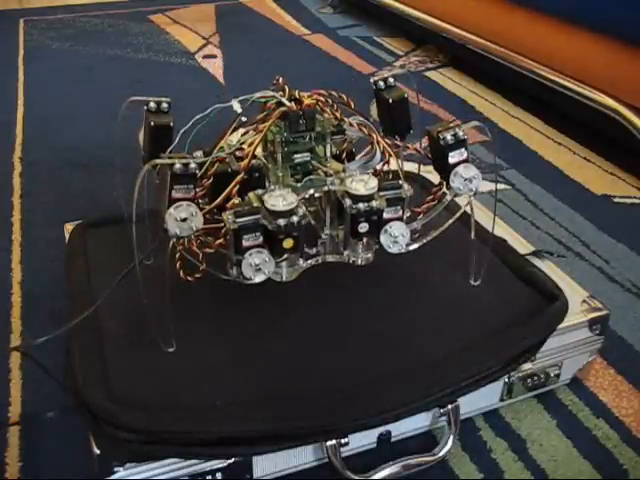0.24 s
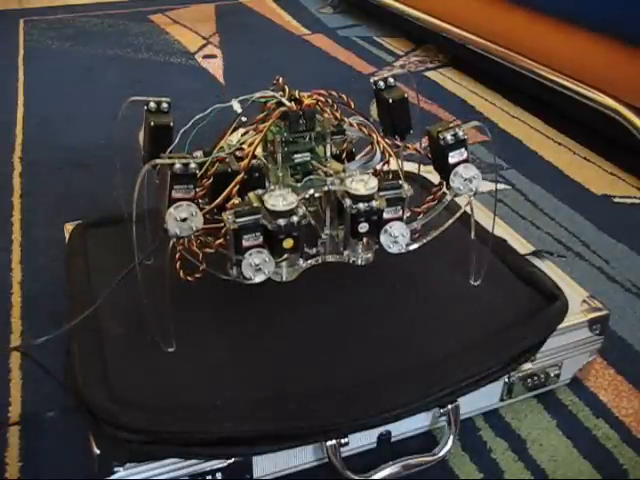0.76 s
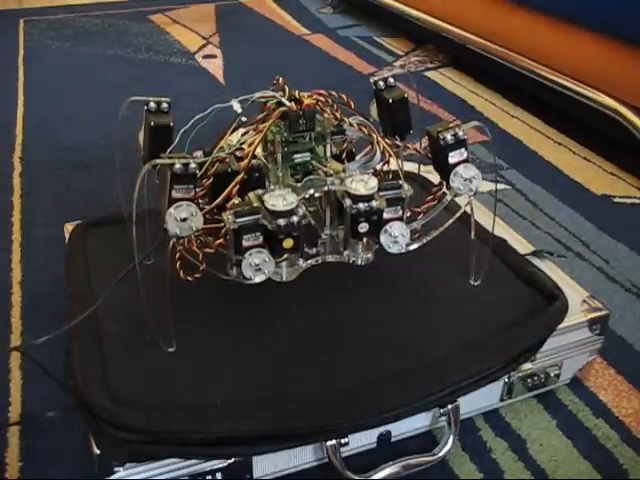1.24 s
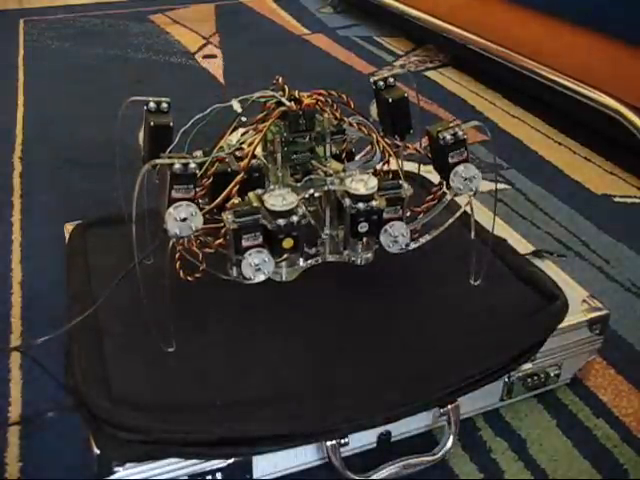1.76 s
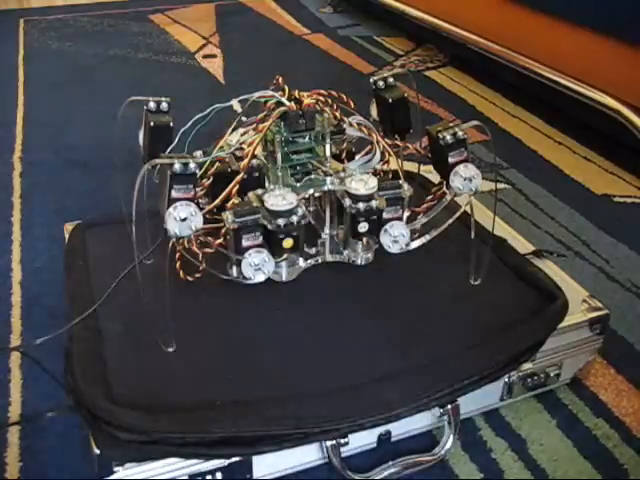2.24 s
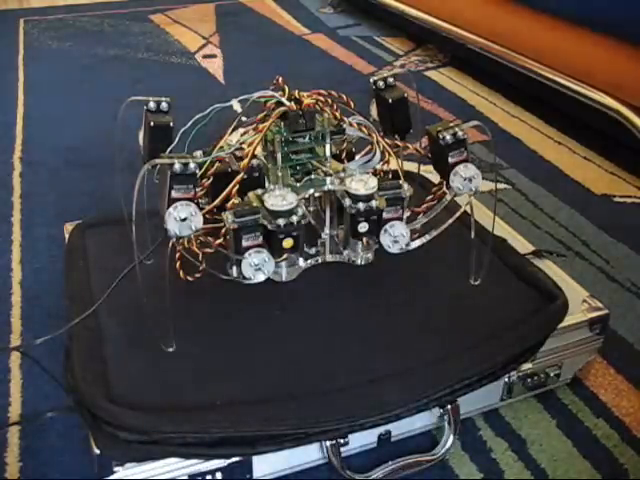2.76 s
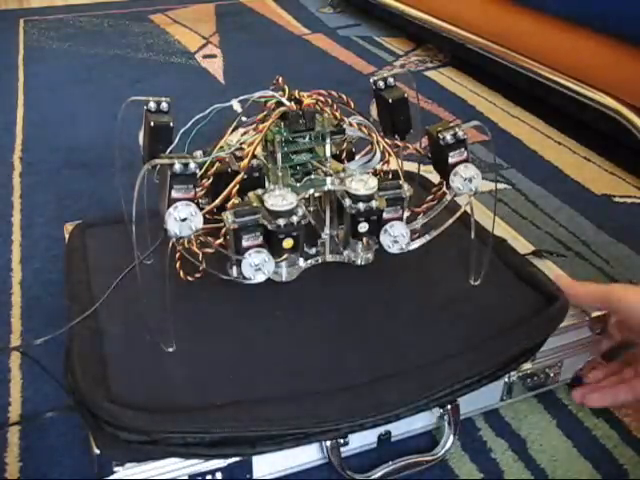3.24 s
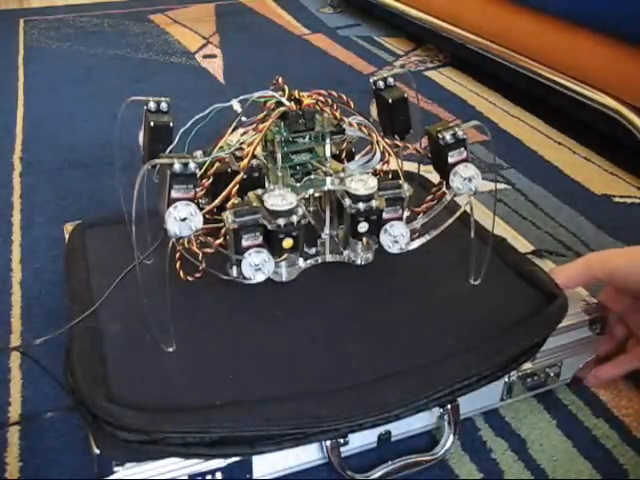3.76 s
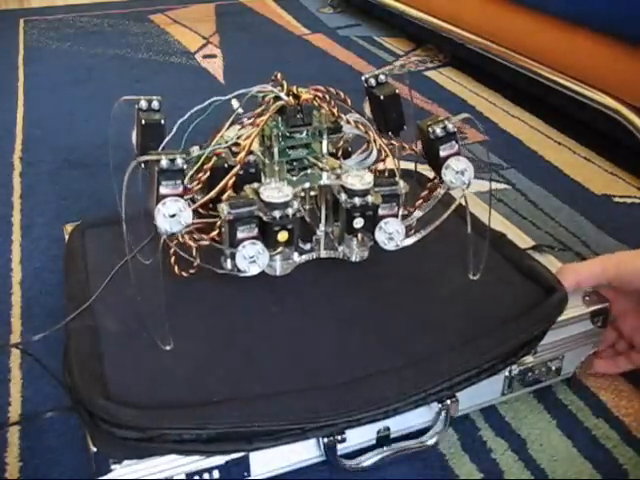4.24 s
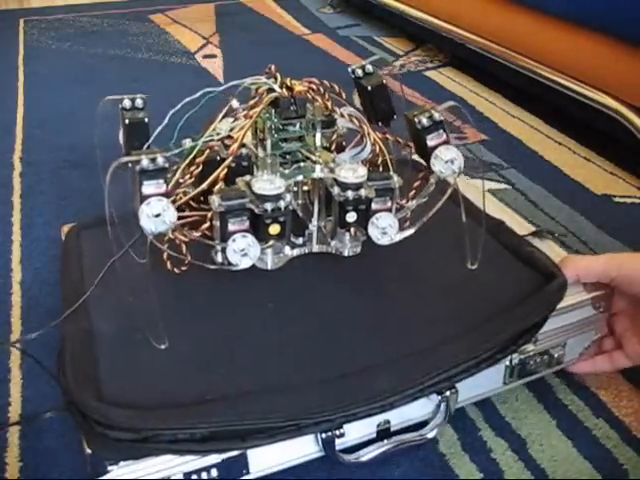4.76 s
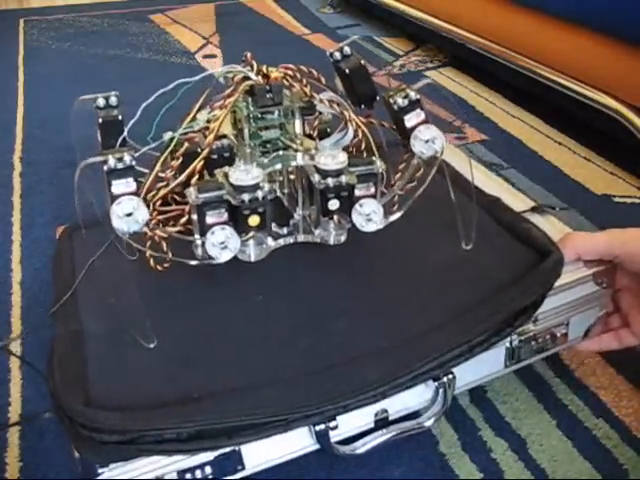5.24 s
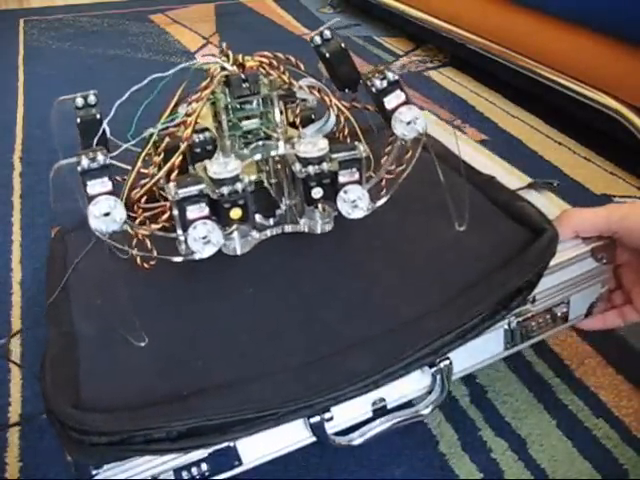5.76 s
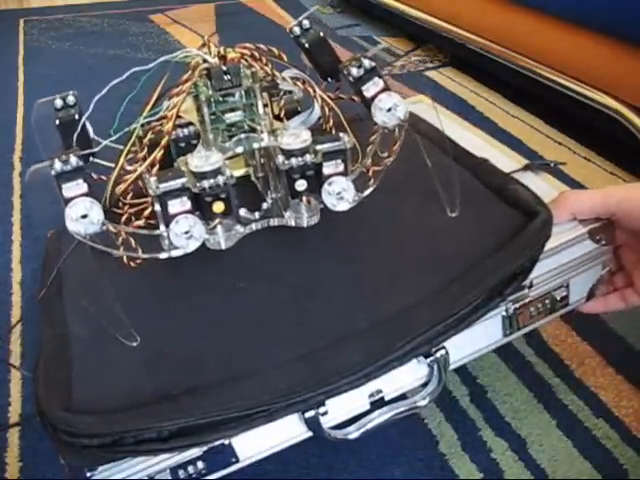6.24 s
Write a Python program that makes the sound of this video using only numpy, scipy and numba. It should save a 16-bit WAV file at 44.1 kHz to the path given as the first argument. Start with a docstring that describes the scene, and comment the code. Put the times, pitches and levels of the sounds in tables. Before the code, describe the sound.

A case knocks, scuffs and rattles briefly while a legged robot's small motors keep humming and ticking, with steady fan noise behind.

```python
"""A small carpeted room, one cheap camera microphone near a legged robot on a metal-edged case.
The robot's hobby servos hum and tick as they hold the legs, with fan noise behind them.
The case is handled and slowly tilted: a short clatter of knocks, scuffs and ringing fittings,
then a few clicks. The camera adds its own whine, ducks after the knocks and holds each of its
coarse samples, which mirrors the treble."""
import sys
import numpy as np
from scipy import signal
from scipy.io import wavfile
from scipy.ndimage import uniform_filter1d
from numba import njit

SR = 44100
rng = np.random.default_rng(int(sys.argv[2]) if len(sys.argv) > 2 else 0)


def transcribe(u):
    """Save the signal u as a 16-bit wav file named by the first command-line argument.

    u: samples, shape (n,) or (channels, n), limited to [-1, 1]; the rate is SR.
    q: integer samples, one column per channel.
    """
    v = np.clip(np.atleast_2d(u).T, -1, 1)
    q = np.round(v * 32767).astype(np.int16)
    wavfile.write(sys.argv[1], SR, q)


N = 286650
TIME = np.arange(N) / SR
HIT = SR // 2  # samples in one struck sound


# The most loaded servo, swelling with its effort. Each row: time in seconds, relative level in dB.
SERVO_EFFORT = [(0, -50), (1.3, -50), (1.53, -37.5), (1.62, -47.5), (1.83, -38), (2.12, -48), (2.48, -39),
                (2.85, -38.5), (3.2, -49.5), (3.6, -42), (4.35, -37.5), (4.52, -42), (4.72, -40),
                (5.18, -51.5), (5.35, -41.5), (5.76, -47), (5.95, -35.5), (6.5, -38.5)]
# Its hum sags as the tilt loads the legs. Each row: time in seconds, pitch in Hz.
SERVO_PITCH = [(0, 247), (.9, 248.1), (2.5, 246.7), (2.95, 249.5), (3.55, 244), (4.05, 248.3), (4.5, 247.2),
               (5.3, 244.4), (5.9, 244.6), (6.5, 247)]
# The case under the robot. Each row: mode frequency in Hz, relative level in dB, t60 in seconds.
CASE_MODES = [(211, -20.5, 0.37), (336, -17, 0.1), (447, -12, 0.11), (593, 3.5, 0.027), (782, -0.5, 0.027),
              (840, -2, 0.051), (949, -0.5, 0.046), (1038, -2.5, 0.046), (1373, -6.5, 0.036),
              (1745, 1.5, 0.011), (1930, -6.5, 0.047), (2240, -13.5, 0.05), (2860, -25.5, 0.013),
              (3605, -9.5, 0.03)]

def servos(hum_db=-1.5, others_db=-48, beat_hz=4.5, tick_db=-49, ticks_per_s=90):
    """One loaded motor hums, the others beat against it; small corrections tick the gears."""
    [effort_db], [hz] = curves(SERVO_EFFORT), curves(SERVO_PITCH)
    hum = undb(effort_db + hum_db + walk(25)) * tone(hz * (1 + 0.0059 * walk(15)))
    others = undb(others_db) * tone((hz + beat_hz) * (1 + 0.01184 * walk(6)))
    kicks = rng.random(N) < ticks_per_s / SR
    scatter_db = 3 * np.clip(rng.standard_normal(N), -2, 2)
    ticks = signal.fftconvolve(kicks * undb(scatter_db), ring(CASE_MODES))[:N]
    return hum + others + undb(tick_db) * unit(ticks)


# Knocks on the case, near the microphone. Each row: start in seconds, relative level in dB,
# contact cut-off in Hz, then thud, lid ring and room send, each in dB against the knock.
CASE_KNOCKS = [(1.8595, -23, 2430, -20, -16, -13), (1.8804, -4, 1900, -15, -3, -15),
               (1.8848, -8.5, 2200, -7, -18, -5), (1.9404, -4, 1100, -23, -22, -6.5),
               (2.0001, -4, 2300, -7, -18, -25), (2.034, -12.5, 1100, -8, -15, -5.5),
               (2.090, -19, 500, 0, -23, -5), (2.2166, -3.5, 855, -24, 8, -8),
               (2.2315, -12, 2200, -8, 4, -12), (2.4422, -20.5, 1900, -24, -22, -4),
               (2.555, -23.5, 1530, -7, -25, -15), (3.0402, -25, 700, 2, -20, -26),
               (3.941, -24, 1260, -21, -2, -6), (6.1448, -27.5, 2407, -24, 6, -13)]

def knocks(knock_db=-9, rattle_db=-1, thud_hz=45, lid_hz=854, lid_width_hz=330):
    """A blow rings case and hollow lid, rattles loose parts, thuds into the floor; soft ones are dull."""
    out = np.zeros((2, N))
    body = unit_onset(ring(CASE_MODES))
    lid_band = [lid_hz - lid_width_hz / 2, lid_hz + lid_width_hz / 2]
    for start, db, contact_hz, thud_db, lid_db, room_db in CASE_KNOCKS:
        rattle = unit_onset(colour(burst(t60=0.11), CLICK_SPECTRUM))
        thud = butter(burst(t60=0.063), thud_hz)
        lid = butter(signal.unit_impulse(HIT) + burst(t60=0.088), lid_band, "band")
        hit = unit_onset(butter(body + undb(rattle_db) * rattle, contact_hz))
        hit += undb(thud_db) * thud / np.abs(thud).max()
        hit += undb(lid_db) * lid / np.abs(lid).max()
        place(out, start, undb(db + knock_db) * hit, room_db)
    return out


# Metal fittings in the clatter. Each row: start in seconds, relative level in dB, pitch in Hz,
# chatter in dB against the strike, chatter t60 in seconds.
FITTING_STRIKES = [(1.9040, -3.5, 2210, 2, 0.078), (2.0002, -6, 2085, 4, 0.023),
                   (2.0845, -3.5, 1970, -3, 0.25)]
# One fitting's modes. Each row: multiple of the pitch, relative level in dB, t60 in seconds.
FITTING_MODES = [(.93, -6, .026), (1, 0, .009), (1.06, -6, 0.026), (1.35, -19, 0.0061), (1.97, -16, 0.0075),
                 (2.07, -24.5, 0.014)]

def clinks(clink_db=-10, room_db=-9):
    """A loose fitting is struck, then chatters on its seat, keeping its close modes ringing roughly."""
    out = np.zeros((2, N))
    for start, db, hz, chatter_db, chatter_t60 in FITTING_STRIKES:
        contact = signal.unit_impulse(HIT) + undb(chatter_db) * burst(chatter_t60)
        modes = ring([(hz * ratio, mode_db, t60) for ratio, mode_db, t60 in FITTING_MODES])
        clink = unit_onset(signal.fftconvolve(contact, modes)[:HIT])
        place(out, start, undb(db + clink_db) * clink, room_db)
    return out


# Small clicks at the case. Each row: start in seconds, relative level in dB, crackle in dB against
# the snap, crackle t60 in seconds, low cut in Hz, room send in dB.
SMALL_CLICKS = [(1.348, -23, -4, 0.015, 800, -1), (1.3697, -34, 5, .03, 900, -5),
                (1.3806, -28.5, 3, 0.01, 2600, -1), (1.8053, -32.5, -10, .006, 1500, 3),
                (1.9993, -13, -9.5, 0.037, 1290, -20), (2.0851, -18, 2, 0.0062, 1400, -6),
                (2.216, -18.5, 13, 0.089, 1180, 2), (2.676, -23.5, 2, 0.02, 2000, -4),
                (3.0398, -15.5, -8, 0.0033, 80, -15), (3.042, -27, 19, .005, 900, -14),
                (3.124, -19.5, 15, .012, 3030, -4), (3.127, -21.5, 2, .025, 3030, -1.5),
                (6.147, -36.5, -2, .04, 1400, -5)]
# The colour of clicks and rattles. Each row: frequency in Hz, gain in dB.
CLICK_SPECTRUM = [(100, 0.5), (700, -3.5), (1500, 12.5), (2300, 8), (3500, 3.5), (4500, -1), (5500, -4)]

def clicks(click_db=-4):
    """Fingers and latches make one clean snap, then a brief crackle; tiny parts radiate little bass."""
    out = np.zeros((2, N))
    for start, db, crackle_db, t60, low_cut_hz, room_db in SMALL_CLICKS:
        contact = signal.unit_impulse(HIT) + undb(crackle_db) * burst(t60)
        click = colour(butter(contact, low_cut_hz, "high"), CLICK_SPECTRUM)
        place(out, start, undb(db + click_db) * unit_onset(click), room_db)
    return out


# The case is pushed along. Each row: start and length in seconds, then scuff, rumble and groan in dB.
CASE_SLIDES = [(1.322, 0.25, -52, -69, -53), (1.81, .07, -33, -55, -55), (1.878, 0.074, -17.5, -34, -26.5),
               (1.99, 0.1, -27, -31, -27), (2.208, 0.057, -32.5, -43, -45), (2.548, 0.14, -44, -41.5, -52),
               (2.754, .14, -42, -62, -62)]
# The colour of the scuffing. Each row: frequency in Hz, relative density in dB.
SCUFF_SPECTRUM = [(80, -21.5), (170, 7), (260, -4.5), (380, 2.5), (800, -5.5), (1500, -7), (2400, -8.5),
                  (3500, -17), (5500, -21.5)]
# Panels driven by the rubbing. Each row: frequency in Hz, relative level in dB, t60 in seconds.
PANEL_MODES = [(166.7, -7.5, 0.19), (339, -0.5, 0.072), (400, -1, 0.14), (444, -1, 0.19)]

def slides(grain_db=3.5):
    """The case scuffs in uneven slips, which make its panels groan, and rumbles as it shifts."""
    gains = sum(np.outer(undb(levels), push(start, length)) for start, length, *levels in CASE_SLIDES)
    scuff_gain, rumble_gain, groan_gain = gains
    slips = rng.standard_normal(N) * undb(grain_db * np.tanh(walk(300)))
    scuff = unit(colour(slips, SCUFF_SPECTRUM))
    groan = unit(signal.oaconvolve(slips, ring(PANEL_MODES))[:N])
    return scuff_gain * scuff + groan_gain * groan + rumble_gain * noise(RUMBLE_SPECTRUM)


def push(start, length, attack_s=0.042, t60=0.46):
    """Envelope of one slide: it builds up, holds while the hand pushes, then dies away."""
    rise = np.clip((TIME - start) / attack_s, 0, 1)
    return rise * np.exp(-np.log(1000) * np.clip((TIME - start - length) / t60, 0, 2))


# Fan and room air behind the robot. Each row: frequency in Hz, relative density in dB.
AIR_SPECTRUM = [(20, -23), (50, -15), (100, -11), (200, -4.5), (330, -6.5), (560, -3), (820, -5.5),
                (1150, -10.5), (1450, -10), (2000, -14.5), (2800, -20), (4000, -21), (5500, -21.5)]
# Faint motor and fan tones. Each row: frequency in Hz, relative level in dB.
FAN_TONES = [(218.5, -54), (290.7, -55.5), (497, -54.5), (543.7, -51), (581, -56), (802, -53.5), (869, -64),
             (1427, -59.5)]
# Low rumble, in the background and under the slides. Each row: frequency in Hz, relative density in dB.
RUMBLE_SPECTRUM = [(15, -4), (30, 5), (52, 4.5), (72, 6), (105, 3), (170, -2.5), (300, -1.5), (900, -76)]

def fans(air_db=-38, mains_hz=120, mains_db=-51, tone_db=-1, rumble_db=-54, fall_db_per_s=1.5):
    """Steady rushing air with mains hum and wavering motor tones, over a rumble that slowly fades."""
    air = noise(AIR_SPECTRUM) * undb(air_db + 0.6 * walk(11))
    mains = undb(mains_db + 1.9 * walk(5.4)) * tone(mains_hz + 0.5 * walk(4.76))
    tones = sum(undb(db + tone_db) * tone(hz * (1 + 0.00336 * walk(5))) for hz, db in FAN_TONES)
    rumble = noise(RUMBLE_SPECTRUM) * undb(rumble_db - fall_db_per_s * TIME)
    return air + mains + tones + rumble


# What the walls send back to the microphone. Each row: frequency in Hz, relative gain in dB.
ECHO_SPECTRUM = [(100, 6), (500, 8), (1000, 5.5), (2500, -0.5), (5500, -1)]

def room(x, gap_s=0.0079, t60=0.38):
    """Diffuse echo of a small carpeted room, building up after a short gap."""
    build_up = 1 - np.exp(-(TIME[:HIT] / gap_s) ** 2)
    echo = colour(burst(t60) * build_up, ECHO_SPECTRUM)
    return signal.oaconvolve(x, echo / np.linalg.norm(echo))[:N]


def camera_whine(db=-45, hz=4740, drift_hz=0.97, frame_hz=30, block_hz=4):
    """The camera's electronics whistle; the phase slips with every frame and every stored block."""
    frame_slip = 0.58 * signal.sawtooth(2 * np.pi * frame_hz * TIME, 0.1)
    block_slip = 0.12 * signal.sawtooth(2 * np.pi * block_hz * TIME, 0.02)
    phase = 2 * np.pi * np.cumsum(hz + drift_hz * walk(3)) / SR + frame_slip + block_slip
    return undb(db) * np.sqrt(2) * np.sin(phase + 0.06 * walk(150))


def gain_control(x, threshold_db=-17):
    """Loud peaks pull the camera's gain down; most of it returns quickly, the rest over seconds."""
    over_db = 20 * np.log10(np.maximum(np.abs(x) / undb(threshold_db), 1))
    fast_db = follow(over_db, attack_s=0.0037, release_s=0.27)
    slow_db = follow(fast_db, attack_s=0.97, release_s=1.6)
    return x * undb(-np.maximum(fast_db, slow_db))


@njit
def follow(x, attack_s, release_s):
    """Envelope that rises and falls at different speeds."""
    out, level = np.empty(len(x)), 0.
    for i in range(len(x)):
        level += (x[i] - level) / (SR * (attack_s if x[i] > level else release_s))
        out[i] = level
    return out


def undb(db):
    """Decibels to gain."""
    return 10 ** (np.asarray(db) / 20)


def unit(x):
    """Scale to rms 1."""
    return x / np.sqrt(np.mean(x ** 2))


def unit_onset(x):
    """Scale a hit so its first 5 ms have rms 1."""
    return x / np.sqrt(np.mean(x[:SR // 200] ** 2))


def curves(rows):
    """Each column after the time column as a value per sample."""
    times, *columns = np.transpose(rows)
    return [np.interp(TIME, times, column) for column in columns]


def walk(rate_hz):
    """Smooth random wandering with a spread near 1."""
    span = max(int(SR / rate_hz), 1)
    steps = np.repeat(rng.standard_normal(N // span + 1), span)
    return 1.271 * uniform_filter1d(uniform_filter1d(steps, span), span)[:N]


def tone(hz):
    """Sine of rms 1 on a moving pitch."""
    return np.sqrt(2) * np.sin(2 * np.pi * np.cumsum(hz) / SR)


def colour(x, points, size=8192):
    """Causal filter with the given (Hz, dB) response."""
    hz, db = np.transpose(points)
    bins = np.maximum(np.abs(np.fft.fftfreq(size, 1 / SR)), 1)
    log_gain = np.log(undb(np.interp(np.log(bins), np.log(hz), db)))
    response = np.fft.ifft(np.exp(np.conj(signal.hilbert(log_gain)))).real  # minimum phase
    return signal.oaconvolve(x, response[:size // 2])[:len(x)]


def noise(spectrum):
    """Steady coloured noise of rms 1."""
    return unit(colour(rng.standard_normal(N), spectrum))


def butter(x, hz, kind="low", order=2):
    """Butterworth filter, low-pass by default."""
    return signal.sosfilt(signal.butter(order, hz, kind, fs=SR, output="sos"), x)


def fade(t60):
    """Half a second of exponential decay, falling 60 dB in t60 seconds."""
    return np.exp(-np.minimum(np.log(1000) * TIME[:HIT] / t60, 20))


def burst(t60):
    """Noise that dies away, with energy 1."""
    x = rng.standard_normal(HIT) * fade(t60)
    return x / np.linalg.norm(x)


def ring(modes):
    """Struck modes (Hz, dB, t60), neighbours swinging in opposite directions."""
    return sum((-1) ** k * undb(db) * fade(t60) * np.sin(2 * np.pi * hz * TIME[:HIT])
               for k, (hz, db, t60) in enumerate(modes))


def place(out, start_s, hit, room_db):
    """Add a hit: row 0 goes straight to the microphone, row 1 into the room."""
    start = int(start_s * SR)
    out[:, start:start + len(hit)] += np.outer([1, undb(room_db)], hit[:N - start])


def scene():
    """Everything that sounds in the room, at one microphone."""
    direct, into_room = knocks() + clinks() + clicks()
    return (servos() + fans() + slides() + direct + room(into_room))[None]


def record(dry, hold=4, top_hz=15500):
    """The camera holds every fourth sample, so the spectrum is mirrored into the treble."""
    ducked = gain_control(dry[0] + camera_whine())
    narrow = butter(ducked, hz=5512, order=8)
    held = np.repeat(narrow[::hold], hold)[:N]
    top_cut = signal.ellip(10, 0.2, 70, top_hz, fs=SR, output="sos")
    return signal.sosfilt(top_cut, held)[None]


dry = scene()
out = record(dry)
transcribe(out)
```